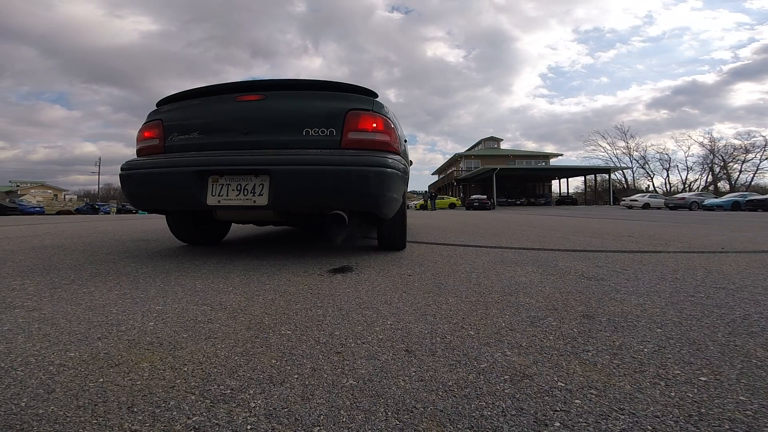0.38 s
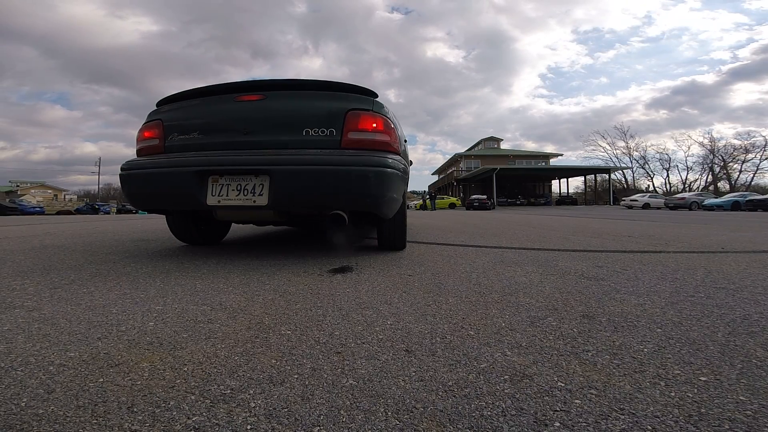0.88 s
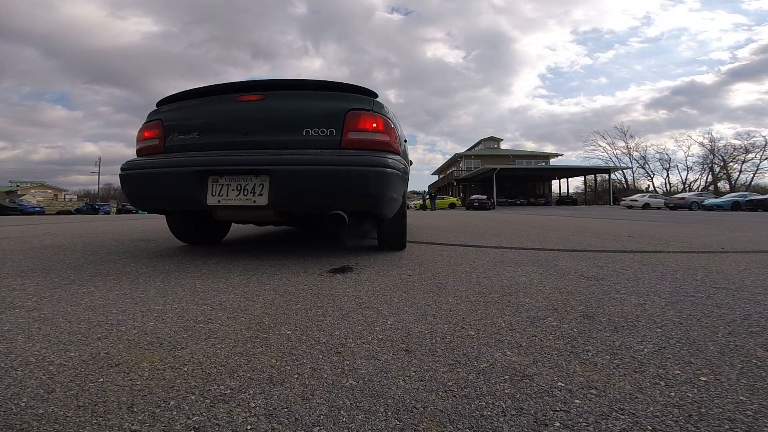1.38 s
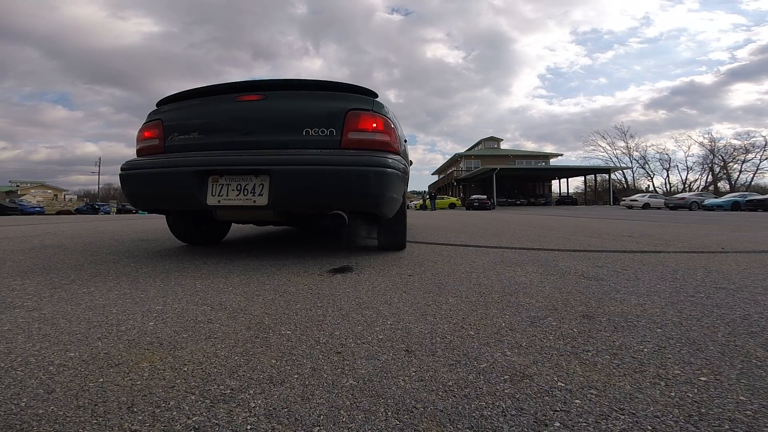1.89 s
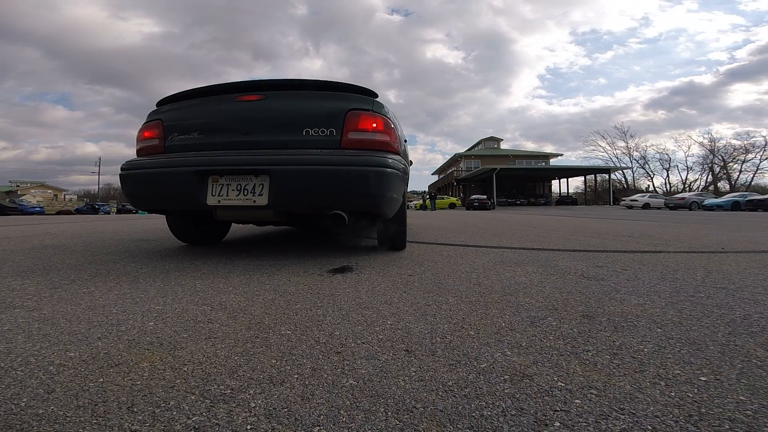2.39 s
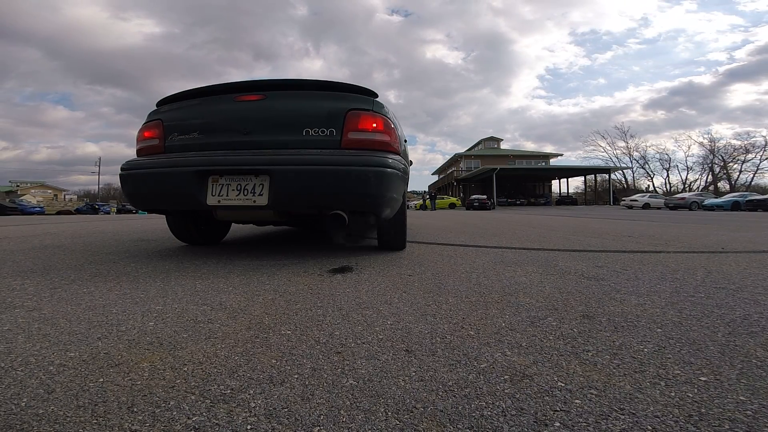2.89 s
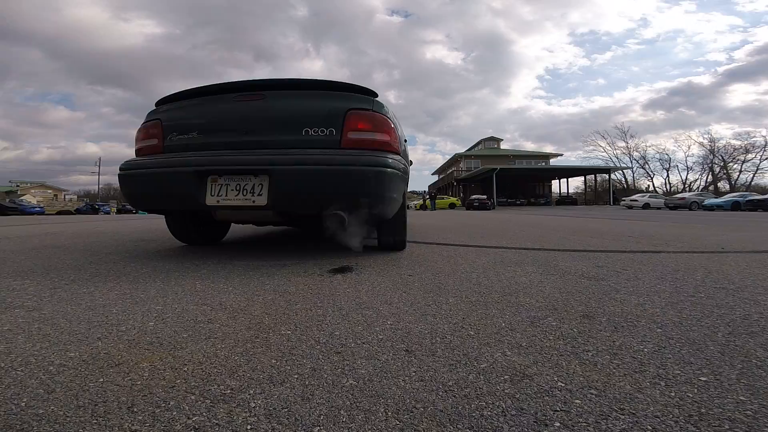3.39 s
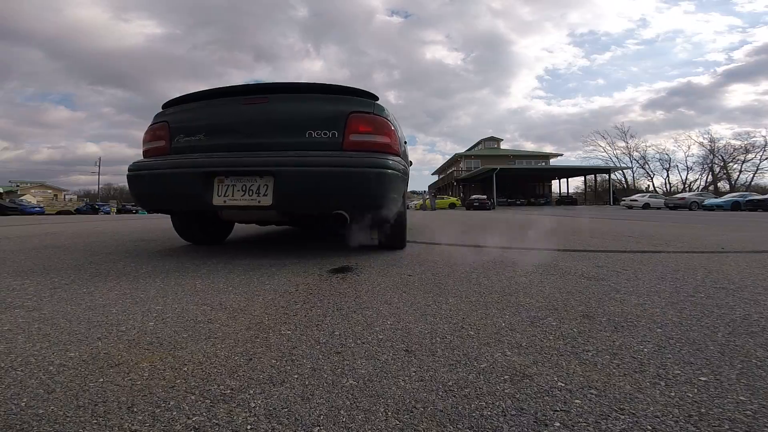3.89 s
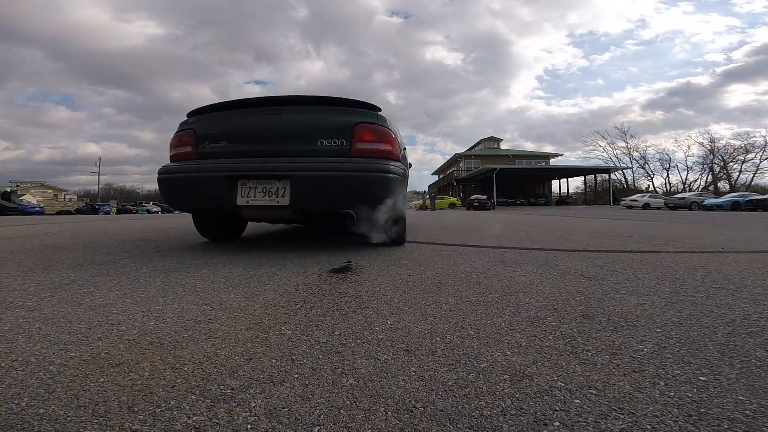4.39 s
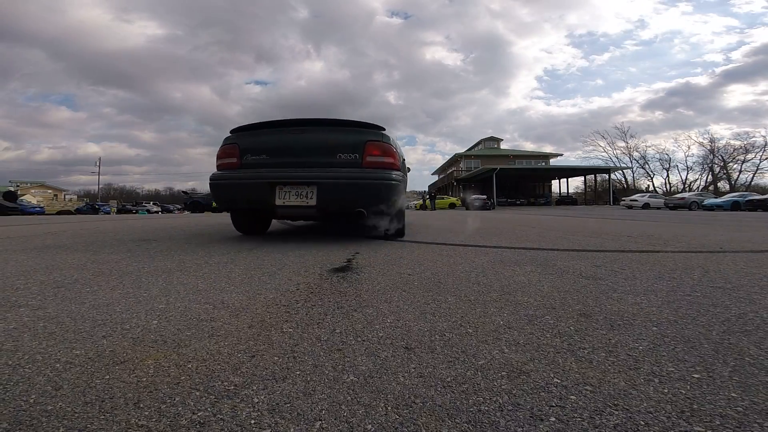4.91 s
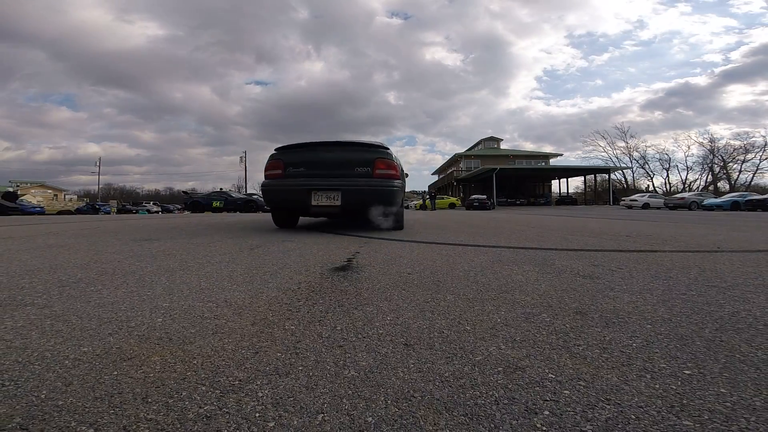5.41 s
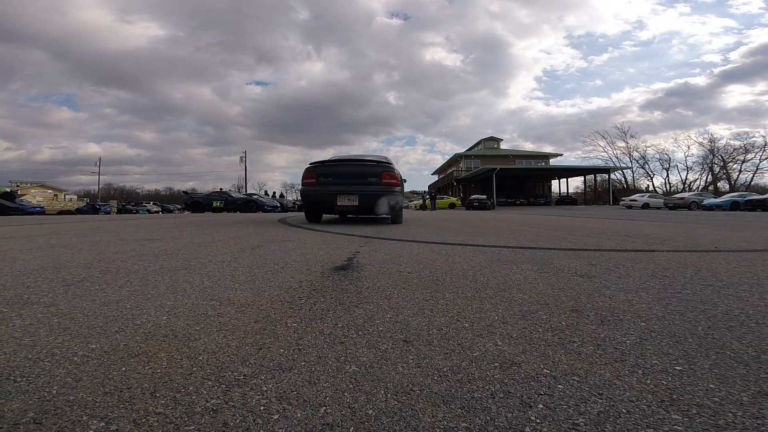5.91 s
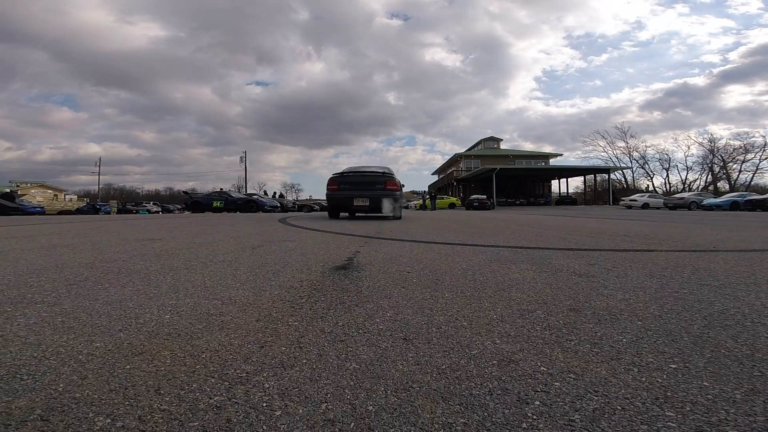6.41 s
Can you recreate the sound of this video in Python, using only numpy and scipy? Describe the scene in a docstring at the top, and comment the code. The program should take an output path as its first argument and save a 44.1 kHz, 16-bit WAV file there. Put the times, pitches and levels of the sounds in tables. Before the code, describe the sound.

In the open, close behind a small four-cylinder car: from 0 to 3.3 seconds it idles steadily, about 28 soft low thumps a second under fluttering, breathy engine-bay noise and thin ringing. Beside it a larger eight-cylinder lopes unevenly, deep and rumbling, rising from 2.3 to a rev peak near 3.1, easing, peaking again around 4.2 to 4.3, then sinking by 5.2. A third engine hums very low far away. At 3.4 the near car abruptly barks, hollow and raspy with spitting gas, climbing quickly; shorter barks follow at 3.9 and 4.4 as it pulls away. Its revs drop to about 5.2, exposing fast metallic ticks until 5.9, then rise gently with two much weaker throttle touches at 5.4 and 5.75. The eight climbs again and rumbles louder; from about 6 seconds lumpy tyre scrub with a thin squeal builds and holds to 6.5. The loud bass is softly rounded.

```python
"""A four-cylinder car idles close by in the open beside a loping eight-cylinder engine; a third hums far off.
The eight revs up and down; from 3.4 s the car blips its throttle three times, then pulls away.
At the end the eight's tyres scrub. Near car: firing pulses and gas noise through pipe resonances, sine thumps,
ticks and ringing bay noise. Eight: wavering crank-order sines over rumble. Scrub: coloured noise and a thin note.
"""
import sys
import numpy as np
from scipy import signal
from scipy.fft import rfft, irfft
from scipy.io import wavfile
from scipy.ndimage import uniform_filter1d

SR = 44100
rng = np.random.default_rng(int(sys.argv[2]) if len(sys.argv) > 2 else 0)


def ratio_of_db(decibels):
    """Turn decibels (scalar or array-like) into linear amplitude factors; 0 dB maps to 1."""
    return 10 ** (np.asarray(decibels, float) / 20)


def master_out(mix):
    """Clip the mix to full scale and print it as 16-bit PCM to the path in sys.argv[1]."""
    frames = np.transpose(np.atleast_2d(mix))
    ceiling = np.clip(frames, -1, 1)
    pcm = np.round(ceiling * 32767).astype(np.int16)
    wavfile.write(sys.argv[1], SR, pcm)


N = 287973
T = np.arange(N) / SR

# far engine's hums: f/Hz, level/dB
FAR_HUM = [(24.1, -34), (44.7, -35), (48.4, -32)]

# tyre scrub spectrum: f/Hz, level/dB
SCRUB_COLOUR = [(240, -40), (400, -8.5), (535, 0), (687, -9.5), (811, 1.5), (985, -11.5), (1200, -13),
                (2080, -16.5), (3830, -32), (5570, -30), (8000, -57), (11000, -63), (14300, -60.5),
                (22000, -120)]
SCRUB_FULL_S, SCRUB_RISE_S, SCRUB_DB = 6.305, .2, -26
SQUEAL_HZ, SQUEAL_WIDTH_HZ, SQUEAL_DB = 807, 31, -6.5  # tread's own note, dB against the scrub

# eight-cylinder speed: t/s, crank speed/(turns/s)
EIGHT_SPEED = [(0, 26.1), (.49, 26.7), (1.42, 24.6), (2.3, 25.2), (2.54, 30.1), (2.8, 35.6), (2.98, 37.2),
               (3.14, 37.9), (3.32, 37.1), (3.61, 34.4), (3.79, 34.5), (4.2, 38.8), (4.33, 38.8),
               (4.51, 37.2), (4.82, 31.8), (5.19, 28.4), (5.32, 28.5), (5.59, 32), (5.78, 32.2),
               (6.03, 34.7), (6.25, 34.8), (6.4, 36.2), (6.53, 36.5)]
# its firing tone by pitch: f/Hz, level/dB
FIRING = [(90, -27), (103, -19), (114, -16), (124, -12), (138, -12.5), (150, -11), (160, -15.5)]
# its uneven-firing tones: crank order/1, level/dB
UNEVEN = [(2, 1), (3, -7.5), (3.5, -10), (4.5, -18), (5, 1), (5.5, -9.5), (6, -1.5), (7, -5.5)]
# its muffler's response to those tones: f/Hz, level/dB
MUFFLER = [(40, -8.5), (60, -3.5), (70, -11), (79, -10.5), (95, -9), (125, -0.5), (155, -3), (175, -15),
           (190, -35.5), (300, -27.5)]
# its rumble spectrum: f/Hz, level/(dB per Hz)
RUMBLE = [(12, 13), (25, 4), (45, -1.5), (65, -5), (85, 11.5), (110, 18.5), (165, 1.5), (200, -8.5),
          (300, -53.5)]
# its rumble over time: t/s, level/dB
RUMBLE_LEVEL = [(0, -7.5), (1.2, -1.5), (2.3, -8), (2.9, -3), (3.5, -1.5), (4.3, -11), (5.0, -6.5),
                (5.7, -3.5), (6.1, 1), (6.53, 5)]
RUMBLE_DB = -18.5
LOAD_DB = 0.1115  # per turn/s gained each second
UNEVEN_DB, UNEVEN_DB_PER_TURN = -16.5, 0.18  # at idle; per turn/s above it
IDLE_TURNS_PER_S, SMOOTH_TURNS_PER_S = 26, 34
ROUGH_IDLE, ROUGH_FAST, ROUGH_SPIN = .21, .08, .2  # wavering share 0-1; SPIN adds

# near engine's speed: t/s, firing rate/(1/s)
FIRING_RATE = [(0, 28.1), (3.33, 28.1), (3.38, 37.2), (3.42, 41.4), (3.52, 60.2), (3.6, 67.6), (3.72, 70.4),
               (3.9, 66.8), (4.15, 70.5), (4.28, 63.5), (4.38, 59.8), (4.6, 61.7), (4.72, 59), (4.86, 46),
               (5.0, 35.2), (5.11, 29.8), (5.22, 26.9), (5.35, 30.1), (5.46, 35.3), (6.0, 44.5),
               (6.53, 48.5)]
FIRST_BARK_S, CLEAR_TICK_S = 3.3675, 5.0565  # moments of one firing, one tick

# engine bay, body and muffler noise, smooth part: f/Hz, level/(dB per Hz)
BAY = [(110, -37), (180, -1), (203, -1.5), (352, -16.5), (418, -14), (677, -10.5), (988, -18), (1320, -24),
       (2070, -23), (3000, -30.5), (4190, -38.5), (5620, -36), (7500, -43.5), (10000, -46.5),
       (11400, -56.5), (14500, -72), (15500, -91)]
# bay over time: t/s, whole-bay level/dB, extra level of low muffler rings/dB
BAY_LEVEL = [(0, 0, -1.5), (1.2, 0.5, 1), (2.3, 0.5, -0.5), (2.9, -1, -2), (3.6, -2.5, 3.5), (4.3, -2.5, 5),
             (5.0, -2.5, -0.5), (5.3, -1, -11.5), (5.7, -1.5, -1), (6.53, 4, -3.5)]
# parts that ring with the near engine, two equal passes: f/Hz, width of a pass/Hz, level/dB
BAY_RINGS = [(247.5, 22.2, -30.5), (290, 39.7, -27), (526, 48, -46.5), (744.6, 25, -40), (791.3, 67, -35),
             (885, 19, -42.5), (1198, 21, -52), (1713, 12, -53.5), (2520, 140, -57.5), (4840, 260, -59),
             (5446, 100, -55), (6200, 54, -66.5), (6840, 130, -65.5), (7660, 260, -66.5),
             (8820, 360, -71.5), (10050, 120, -69)]
BAY_DB = -29.5
LEAVES_S = 4.3  # car rolls off
RING_FADE_DB_PER_S, THUMP_FADE_DB_PER_S = 3, 3.5

# valve ticks as the engine slows, then picks up again: t/s, level/dB
TICKS = [(4.9, -68), (5.05, -50), (5.2, -46.5), (5.33, -43.5), (5.46, -44.5), (5.55, -52), (5.7, -52),
         (5.85, -54), (5.93, -59.5)]
# tick resonances, two equal passes: f/Hz, width of a pass/Hz, level/dB
TICK_RING = [(5770, 1600, 19), (6300, 1100, 3), (7800, 1300, -11), (10000, 2100, -7)]
TICK_DECAY_S = .0032

# tailpipe resonances: f/Hz, width/Hz, level/dB
TAILPIPE = [(211, 41.8, 2.5), (290, 78.2, 3.5), (412, 126.5, -1.5), (554, 90, -6), (734, 78, -16)]
# gas burst spectrum: f/Hz, level/(dB per Hz)
CRACK = [(1200, -18), (2200, -6), (3300, 1.5), (4200, -1.5), (5500, 4), (7000, -7), (9500, -7),
         (11200, -18.5), (14000, -23.5), (15300, -29)]
# exhaust thump by its pitch: f/Hz, level/dB
THUMP = [(20, -24), (28, -21), (36, -17.5), (46, -23), (60, -24), (72, -18)]
# thump's octave by its pitch: f/Hz, level/dB
OCTAVE = [(40, -30), (56, -25.5), (75, -23.5), (95, -30), (122, -23), (145, -19.5)]
# throttle openings, levels as it shuts: opens t/s, shuts t/s, bark level/dB, drone level/dB, crack level/dB
BLIPS = [(3.387, 3.546, -15, -16.5, -43), (3.916, 4.05, -17.5, -15.5, -44), (4.383, 4.556, -17, -15, -45),
         (5.415, 5.48, -32.5, -33, -60.5), (5.75, 5.88, -20.5, -34, -62)]
# voice against throttle: jump before/(dB/s), swell while open/(dB/s), fall after/(dB/s), light-throttle level/dB
BARK_SHAPE = (129.5, 21, 65.5, -32)
DRONE_SHAPE = (150, 8.5, 58.5, -26.5)
CRACK_SHAPE = (350, 28.5, 160, -66)
CRUISE_HZ = 60  # firing rate the octave slopes count from
BARK_DB_PER_OCTAVE = -2
CRACK_DB_PER_OCTAVE = -14  # slow firings spit harder
DRONE_DB_PER_OCTAVE = 17  # light throttle only
THUMP_FOLLOWS_BARK = .45  # share of the bark's dB rise
PIPE_TOP_HZ, SPIT_DECAY_S = 1800, .0038


def evened(x):
    """Scales to rms 1."""
    return x / np.sqrt(np.mean(abs(x) ** 2) + 1e-20)


def curves(rows, quiet=None):
    """Table columns as sample-rate curves."""
    s, *columns = np.transpose(rows)
    return [np.interp(T, s, c, left=quiet) for c in columns]


def read(points, hz):
    """Reads a spectrum table on a log-frequency axis."""
    f, value = np.transpose(points)
    return np.interp(np.log(hz + 1), np.log(f + 1), value, left=-90)


def colour(x, points):
    """Filters x by a spectrum table."""
    gain_db = read(points, np.fft.rfftfreq(N, 1 / SR))
    return irfft(rfft(x) * ratio_of_db(gain_db), N)


def ring(x, hz, width_hz):
    """Resonance of gain about 1, from one complex pole."""
    r = np.exp(-np.pi * width_hz / SR)
    pole = r * np.exp(2j * np.pi * hz / SR)
    return 2 * signal.lfilter([1 - r], [1, -pole], x).real


def ring_twice(x, hz, width_hz):
    """Two equal resonances in series: steeper skirts."""
    return ring(ring(x, hz, width_hz), hz, width_hz)


def wander(hz):
    """Random curve of rms 1, hz knots a second joined by straight lines."""
    knots = rng.standard_normal(800)
    return evened(np.interp(T * hz, np.arange(len(knots)), knots))


def firings(rate, anchor_s, spread_db):
    """Firing count, whole at anchor_s, and a random strength held over each firing."""
    turns = np.cumsum(rate) / SR
    anchor = turns[int(anchor_s * SR)]
    turns = turns - np.floor(turns[0] - anchor) - anchor
    strengths = ratio_of_db(spread_db * rng.standard_normal(600))
    return turns, strengths[turns.astype(int)]


def far_idle():
    """Engine idling farther off: low sines wavering in level and phase."""
    out = np.zeros(N)
    for hz, db in FAR_HUM:
        level = np.sqrt(2) * ratio_of_db(db + 3.4 * wander(6.9))
        out += level * np.sin(2 * np.pi * hz * T + 1.3 * wander(8.1))
    return out


def wheelspin():
    """Share 0-1 of full wheelspin: builds up, then holds."""
    return np.exp(-.5 * (np.minimum(T - SCRUB_FULL_S, 0) / SCRUB_RISE_S) ** 2)


def tyre_scrub():
    """Rubber judders over asphalt: lumpy noise, and a thin narrow-band note that sets in early."""
    lumps = ratio_of_db(1.4 * wander(60))
    scrub = evened(colour(rng.standard_normal(N) * lumps, SCRUB_COLOUR))
    squeal = evened(ring_twice(rng.standard_normal(N), SQUEAL_HZ, SQUEAL_WIDTH_HZ))
    spin = wheelspin()
    return ratio_of_db(SCRUB_DB) * (spin * scrub + ratio_of_db(SQUEAL_DB) * spin ** .35 * squeal)


def eight_cylinder():
    """Crank orders over rumble: the fourth is the firing tone, the rest uneven firing; each wavers alone."""
    crank_hz = curves(EIGHT_SPEED)[0]
    angle = 2 * np.pi * np.cumsum(crank_hz) / SR
    rough = np.interp(crank_hz, (IDLE_TURNS_PER_S, SMOOTH_TURNS_PER_S), (ROUGH_IDLE, ROUGH_FAST))
    rough = np.clip(rough + ROUGH_SPIN * wheelspin(), 0, 1)
    gain_per_s = uniform_filter1d(np.gradient(crank_hz) * SR, size=SR // 8)
    firing_db = read(FIRING, 4 * crank_hz) + LOAD_DB * gain_per_s
    uneven_db = UNEVEN_DB + UNEVEN_DB_PER_TURN * (crank_hz - IDLE_TURNS_PER_S)
    tones = [(4, firing_db)]
    tones += [(order, uneven_db + db + read(MUFFLER, order * crank_hz)) for order, db in UNEVEN]
    rumble = evened(colour(rng.standard_normal(N), RUMBLE))
    out = ratio_of_db(RUMBLE_DB + curves(RUMBLE_LEVEL)[0]) * rumble
    for order, db in tones:
        chance = (wander(18) + 1j * wander(18)) / np.sqrt(2)
        waver = np.sqrt(1 - rough ** 2) + rough * chance
        # whole orders from the fourth up share a phase: one throb a turn
        free = order % 1 > 0 or order < 4
        phase = 2 * np.pi * rng.random() * free
        out += np.sqrt(2) * ratio_of_db(db) * (waver * np.exp(1j * (order * angle + phase))).imag
    return out


def engine_bay():
    """Noise throbbing a little with the firings, part of it held in ringing panels and pipes."""
    bay_db, muffler_db = curves(BAY_LEVEL)
    turns, strength = firings(curves(FIRING_RATE)[0], FIRST_BARK_S, 0.98)
    throb = strength * (1 + .5 * np.exp(-(turns % 1) / 0.17))
    wash = ratio_of_db(BAY_DB) * evened(colour(rng.standard_normal(N) * np.sqrt(throb), BAY))
    shake = rng.standard_normal(N) * throb
    # thin high rings flutter more, follow the bay level twice as steeply, fade as the car rolls off
    thin_db = bay_db - RING_FADE_DB_PER_S * np.maximum(T - LEAVES_S, 0)
    rings = np.zeros(N)
    for hz, width_hz, db in BAY_RINGS:
        thin = hz > 4000
        level_db = db + muffler_db * (hz < 400) + thin_db * thin
        flutter_db = (1.8 if thin else 1.2) * wander(25)
        rings += ratio_of_db(level_db + flutter_db) * evened(ring_twice(shake, hz, width_hz))
    return ratio_of_db(bay_db) * (wash + rings)


def valve_ticks():
    """One short metal tick per firing: decaying noise through resonances."""
    rate = curves(FIRING_RATE)[0]
    turns, strength = firings(rate, CLEAR_TICK_S, 1.1)
    since_s = turns % 1 / rate
    blow = rng.standard_normal(N) * strength * np.exp(-since_s / TICK_DECAY_S)
    metal = sum(ratio_of_db(db) * ring_twice(blow, hz, width_hz) for hz, width_hz, db in TICK_RING)
    return ratio_of_db(curves(TICKS, -90.5)[0]) * evened(metal)


def throttle(column, jump, swell, fall, light_db, light_extra_db=0):
    """dB curve of one exhaust voice: jumps as the throttle opens, swells, falls back."""
    power = ratio_of_db(2 * (light_db + light_extra_db)) * (T > BLIPS[0][0])
    for opens, shuts, *db in BLIPS:
        under_db = jump * np.maximum(opens - T, 0)
        under_db += swell * np.clip(shuts - T, 0, shuts - opens)
        under_db += fall * np.maximum(T - shuts, 0)
        power = power + ratio_of_db(2 * (db[column] - under_db))
    return 10 * np.log10(power + 1e-12)


def near_car():
    """Thump at the firing rate; under throttle each firing barks in the tailpipe, drones and spits gas."""
    rate = curves(FIRING_RATE)[0]
    octaves = np.log2(rate / CRUISE_HZ)
    bark_db = throttle(0, *BARK_SHAPE) + BARK_DB_PER_OCTAVE * octaves
    drone_db = throttle(1, *DRONE_SHAPE, DRONE_DB_PER_OCTAVE * octaves)
    crack_db = throttle(2, *CRACK_SHAPE) + CRACK_DB_PER_OCTAVE * octaves
    turns, strength = firings(rate, FIRST_BARK_S, 1.4)
    since_s = turns % 1 / rate

    thump_db = read(THUMP, rate) + THUMP_FOLLOWS_BARK * np.maximum(bark_db - BARK_SHAPE[-1], 0)
    thump_db -= THUMP_FADE_DB_PER_S * np.maximum(T - LEAVES_S, 0)
    thump = np.sqrt(2) * ratio_of_db(thump_db + .8 * wander(14)) * np.sin(2 * np.pi * turns + .6)
    octave_level = np.sqrt(2) * ratio_of_db(read(OCTAVE, 2 * rate) + 2.2 * wander(18))
    octave = octave_level * np.sin(4 * np.pi * turns + .5 * wander(20))

    fires = np.diff(np.floor(turns), prepend=0) > 0
    pulses = evened(fires * strength / np.sqrt(rate))
    drive = pulses + .4 * evened(rng.standard_normal(N) * np.exp(-since_s / .007))
    pipe = np.zeros(N)
    for k, (hz, width_hz, db) in enumerate(TAILPIPE):
        pipe += (-1) ** k * ratio_of_db(db) * ring(drive, hz, width_hz)  # alternating sign
    pipe = signal.sosfilt(signal.butter(2, PIPE_TOP_HZ, fs=SR, output='sos'), pipe)

    # cylinder pairs reach the muffler by unequal paths: every other firing stronger, half orders sound
    odd = (np.floor(turns) - np.round(turns[int(FIRST_BARK_S * SR)])) % 2
    clean = .7 * pulses + .3 * drive
    drone = ring(ring(clean * (0.11 + odd), 308, 70), 277.5, 62)

    spit = (np.exp(-since_s / SPIT_DECAY_S) + 0.15) * (1 - np.exp(-since_s / .0003))
    gas = rng.standard_normal(N) * strength * ratio_of_db(4.0 * (1 - odd)) * spit
    bark = ratio_of_db(bark_db) * evened(pipe)
    crack = ratio_of_db(crack_db) * evened(colour(gas, CRACK))
    return thump + octave + bark + ratio_of_db(drone_db) * evened(drone) + crack


def scene():
    """All sources at one microphone in the open."""
    return (far_idle() + tyre_scrub() + eight_cylinder() + engine_bay() + valve_ticks() + near_car())[None]


def low_pass(x):
    """Removes everything above the highest recorded frequency."""
    return signal.sosfilt(signal.butter(12, 15290, fs=SR, output="sos"), x)


def record(dry):
    """Input stage softly rounds the loud bass."""
    mix = 1.404 * np.tanh(dry / 1.359)
    return low_pass(mix)


dry = scene()
out = record(dry)
master_out(out)
```